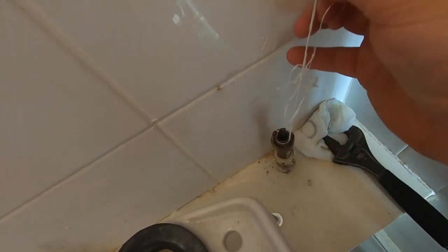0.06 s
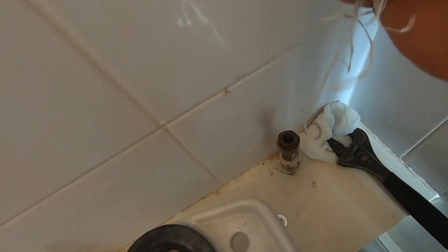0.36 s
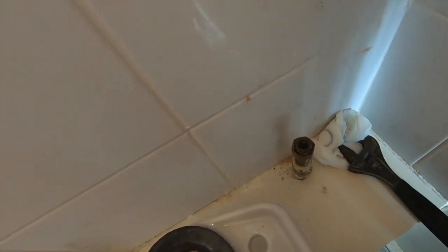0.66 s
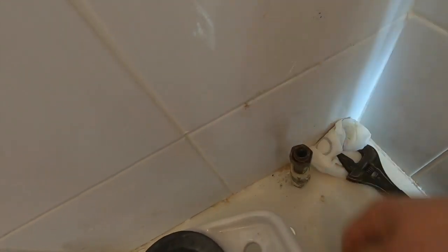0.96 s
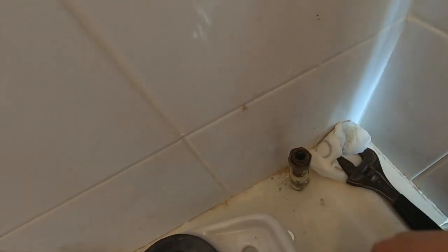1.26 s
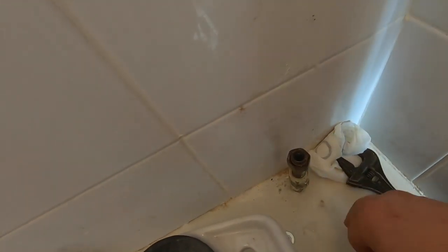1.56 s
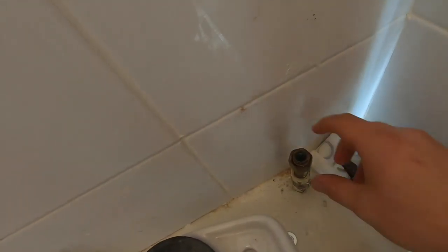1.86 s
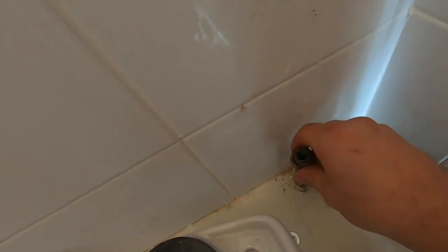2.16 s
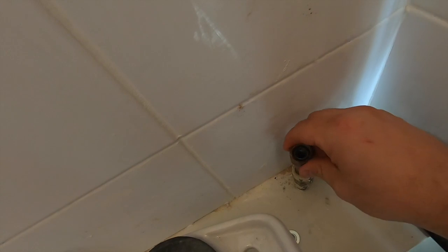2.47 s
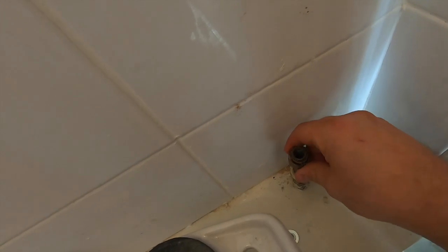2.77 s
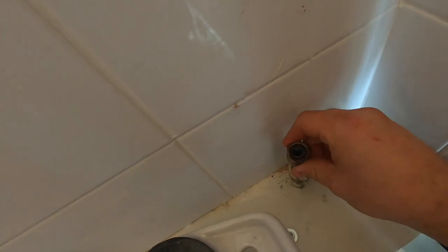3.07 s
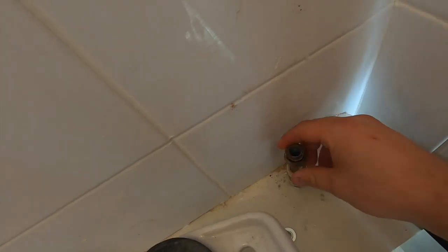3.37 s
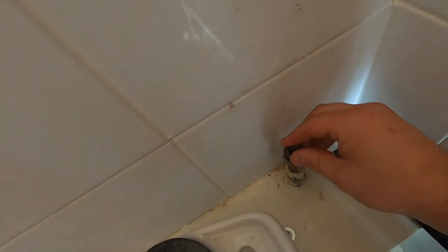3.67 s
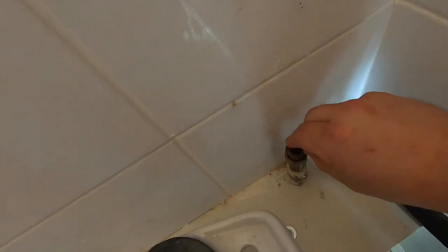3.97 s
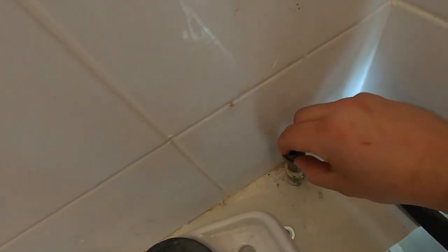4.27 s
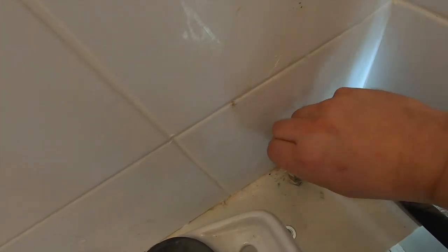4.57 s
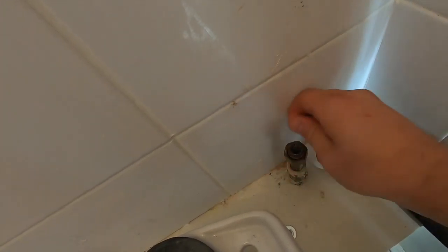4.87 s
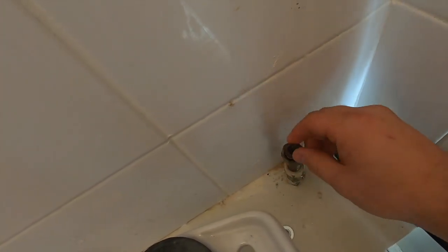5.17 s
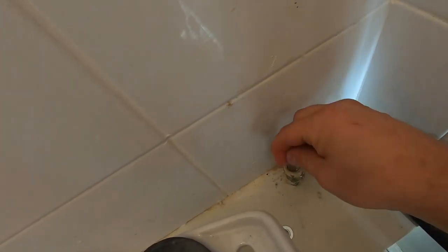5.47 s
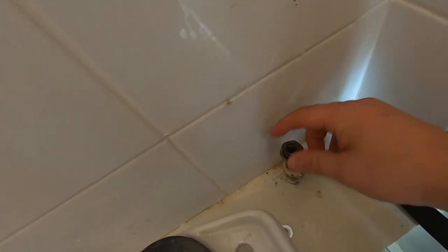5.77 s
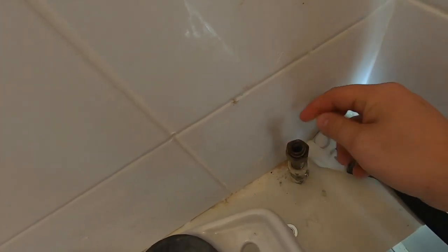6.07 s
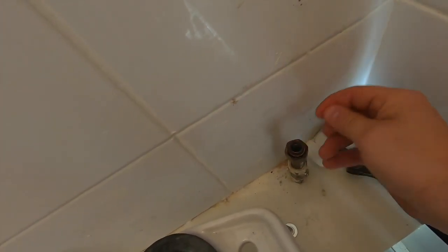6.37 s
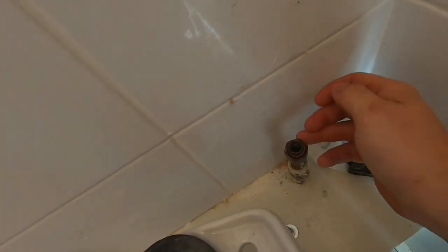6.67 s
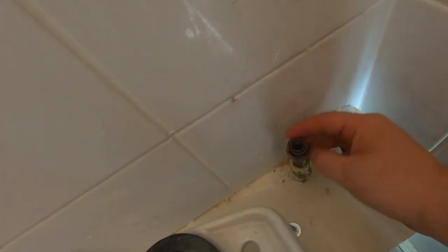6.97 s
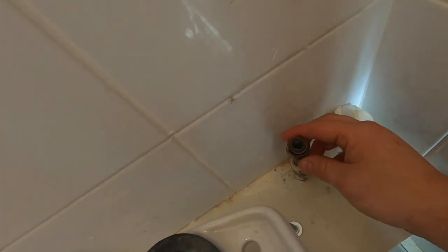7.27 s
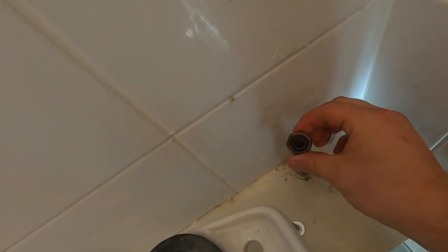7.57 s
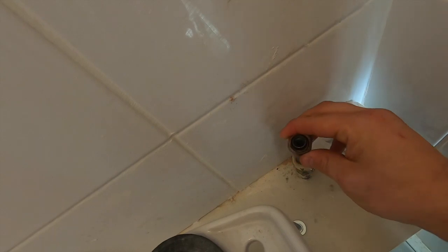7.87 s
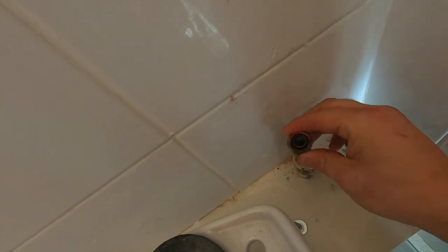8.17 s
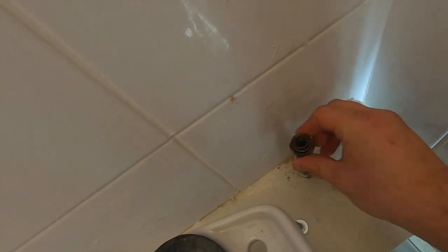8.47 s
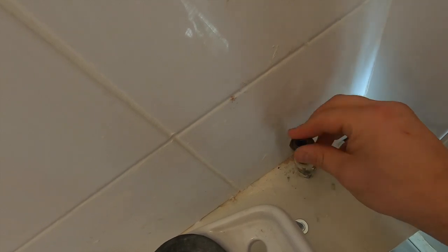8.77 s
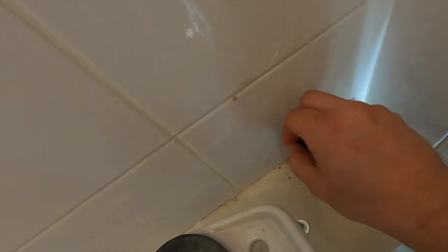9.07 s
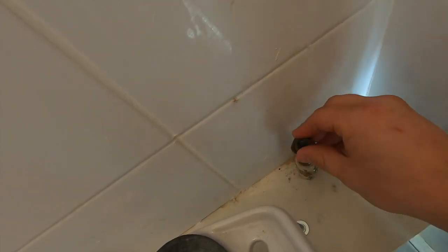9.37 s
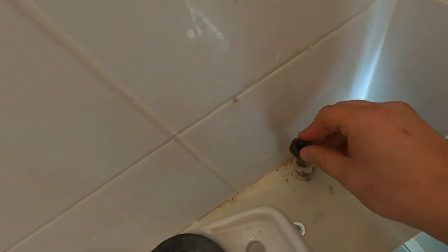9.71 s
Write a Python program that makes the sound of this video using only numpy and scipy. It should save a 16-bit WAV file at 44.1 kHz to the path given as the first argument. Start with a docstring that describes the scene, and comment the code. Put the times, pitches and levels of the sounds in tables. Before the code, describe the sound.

Soft thumps of a hand on a pipe and a faint rustle come first, close up in a small tiled bathroom. Then fingers turn a loose metal fitting on the pipe: the threads grind, catch and snap free, and the fitting knocks in uneven clusters. Each contact rings briefly with a low boom. After a quieter stretch, the last twists are loudest, with tiny squeaks and a thin metallic ring.

```python
"""Soft thumps of a hand on a pipe and a faint rustle, close up in a small tiled bathroom. Then fingers work
a loose threaded fitting onto the pipe stub: the threads grind, squeak, catch and snap free, rocking the
fitting so that it knocks in clusters. Each contact rings the metal and the tiles, with a short boom in
the bass. Skin and sealing thread hiss over still air, and the last twists seat the fitting so it sings."""
import sys
import numpy as np
from scipy import signal
from scipy.fft import rfft, irfft
from scipy.io import wavfile

SR = 44100
rng = np.random.default_rng(int(sys.argv[2]) if len(sys.argv) > 2 else 0)


def wav_out(sig):
    """Save sig, one row per channel (or a flat mono array), as 16-bit PCM at SR to the path in sys.argv[1]."""
    wavfile.write(sys.argv[1], SR, np.round(np.clip(np.atleast_2d(sig).T, -1, 1) * 32767).astype(np.int16))


N = 429534

# soft bumps of the hand on the pipe: start_s, level_db
HAND_BUMPS = [(0.0, -28), (0.073, -34.5), (0.288, -34.5), (0.324, -31), (0.399, -36.5), (2.176, -41),
              (2.39, -20), (2.985, -18), (3.642, -28.5), (4.897, -41), (5.293, -40), (5.93, -27.5),
              (6.304, -32.5), (6.687, -34.5), (6.76, -21.5), (7.095, -32.5), (7.234, -41), (7.416, -26),
              (7.539, -12.5), (7.559, -10), (7.656, -14), (7.945, -21), (8.522, -14), (8.579, -18),
              (9.46, -35), (9.626, -40.5)]
# sealing thread and skin sliding: start_s, length_s, level_db, centre_hz
SKIN_RUSTLES = [(0.0, 0.091, -72, 4370), (0.269, 0.22, -68.5, 7150), (0.283, .17, -67, 2150),
                (0.927, 0.03, -61, 3300), (1.013, 0.062, -65, 3940), (1.089, 0.01, -56, 7750),
                (1.627, 0.042, -68, 5170), (1.769, 0.029, -67.5, 6300), (1.821, 0.18, -72.5, 3400),
                (3.854, 0.025, -67.5, 2530), (4.931, 0.1, -62.5, 6050), (6.354, 0.053, -67.5, 7000),
                (6.456, 0.53, -68.5, 2510), (9.372, 0.0066, -67.5, 5120)]
# single knocks of the fitting: start_s, level_db, hardness_db_per_octave
FITTING_KNOCKS = [(1.06, -64, 4), (2.242, -46.5, -1.5), (2.605, -31.5, -1.5), (2.635, -18.5, 0),
                  (2.901, -40, -2.5), (3.131, -35, -2), (3.167, -39, -2.5), (3.583, -28.5, 0),
                  (4.316, -32.5, 0), (4.459, -33.5, -2), (4.529, -54.5, 5), (4.641, -48.5, -1.7),
                  (4.689, -45.5, -2.9), (4.866, -45.5, -1.5), (5.343, -50.5, -3), (5.476, -46.5, -0.8),
                  (5.508, -43, -3.2), (5.977, -22, 0.3), (6.294, -47.5, -5.5), (6.392, -41.5, -2.5),
                  (6.744, -23, 4.5), (6.812, -26, 0.6), (7.452, -18, -1), (7.491, -25, 5),
                  (7.609, -30.5, -0.5), (7.926, -27, -1.5), (8.055, -36, -3.5), (8.092, -22, 0.36),
                  (8.41, -22, -0.7), (8.573, -14, 1.03), (8.831, -28, 2.5), (9.068, -34.5, 3.5),
                  (9.272, -50.5, -0.6), (9.403, -51, -2)]
# smooth twists and rubs: start_s, end_s, level_db
SMOOTH_TWISTS = [(2.241, 2.3, -48), (2.494, 2.596, -35.5), (3.182, 3.226, -49), (4.062, 4.139, -44),
                 (4.693, 4.752, -52.5), (4.892, 4.999, -46.5), (5.376, 5.445, -51.5), (5.558, 5.668, -53),
                 (5.925, 5.963, -44.5), (6.345, 6.448, -48), (6.472, 6.719, -58), (7.436, 7.518, -23.5),
                 (7.598, 7.724, -29.5), (7.824, 7.897, -34), (7.892, 7.972, -28.5), (8.056, 8.119, -26.5),
                 (8.149, 8.208, -37.5), (8.206, 8.296, -27), (8.385, 8.47, -24), (8.485, 8.568, -41),
                 (9.172, 9.263, -51.5)]
# turns that catch and snap free: catch_s, snap_s, level_db, run_up_s, run_up_db, blow_count
HARD_TURNS = [(2.32, 2.33, -16, .03, -27.5, 4), (2.666, 2.678, -19.5, 0.06, -28.5, 2),
              (2.92, 2.946, -16.5, .017, -35, 4), (3.262, 3.282, -18, 0.043, -35, 3),
              (8.542, 8.545, -17, 0.062, -29, 2)]
# squeaks and groans of binding threads: middle_s, length_s, pitch_hz, level_db
THREAD_SQUEAKS = [(2.969, 0.0081, 368, -8.5), (7.449, 0.03, 791, -13), (7.928, 0.018, 1180, -30.5),
                  (8.088, 0.0136, 600, -17.5), (8.542, .003, 6550, -11), (8.57, .014, 289.3, -13)]
# the hand closes round the fitting: start_s, end_s
GRIP_SPANS = [(2.2, 3.4), (7.3, 8.7)]

# force spectra of a fleshy bump, a metal knock and one slip of the threads: frequency_hz, level_db
FLESH_TONE = [(140, -3), (400, -23.5), (1300, -36.5), (3700, -70)]
KNOCK_TONE = [(140, -0.5), (400, -7), (1300, -5), (3300, -15), (4800, -17.5), (8000, -23.5)]
GRIND_TONE = [(70, -6.5), (140, 0), (400, -5), (1300, -7.5), (3700, -20), (7000, -22)]
# hollow colour of the closed hand, which damps the clack: frequency_hz, gain_db
CUPPED_EQ = [(120, -1), (210, 2.5), (400, 3.5), (700, 1.5), (1300, -2), (3700, -1), (7000, 4)]

# booming modes of the room and the pipe's mount: pitch_hz, level_db, t60_s
BOOM_MODES = [(81, -12, 0.34), (110.9, -1, 0.33), (128.2, -6, .32), (141.9, -6.5, 0.36), (181, -2, 0.38),
              (186.9, -10.5, .62), (231.4, -10, 0.34), (245.7, -11.5, 0.31), (291.9, -2, 0.17),
              (365.8, -2.5, 0.16), (511.7, -4.5, 0.27)]
# modes of the fitting and its pipe: pitch_hz, level_db, t60_s
METAL_MODES = [(640, -12.5, 0.14), (866, -11.5, .2), (990, -12, .18), (1120, -13, 0.26), (1165, -11, .2),
               (1305, -13, 0.12), (1505, -11.5, 0.2), (2480, -13.5, 0.14), (3400, -16, .14),
               (3970, -17, .12)]
# partials that sing once the fitting sits tight: pitch_hz, level_db, t60_s
SEATED_MODES = [(2662, -12.5, 0.28), (2590, -11.5, .35), (2557, -15, .3), (7150, -21, .22)]
# dense ring of the tiled room: frequency_hz, density_db, t60_s
TILE_REVERB = [(144, -36, 0.61), (320, -30.5, 0.35), (620, -28.5, 0.21), (1090, -29.5, .28),
               (2000, -34.5, 0.28), (2940, -31.5, 0.29), (3772, -31, 0.27), (5730, -45, 0.26),
               (7300, -42.5, 0.16), (9020, -56, 0.35), (9670, -39, .22), (10390, -48.5, 0.089),
               (10600, -73, 0.13), (14300, -63, 0.11)]
# stereo width of that ring: frequency_hz, side_gain_db
REVERB_WIDTH = [(120, -20), (280, -21), (550, -4), (1100, -1), (2500, -6), (5000, -3.5), (8000, 1.5)]
# room tone of still air: frequency_hz, density_db
AIR_TONE = [(15, -30.5), (25, 3), (54, 4), (98, -13.5), (181, 3.5), (558, -14.5), (769, -4.5),
            (1150, -19.5), (1280, -15.5), (1720, -18.5), (3260, -23), (7680, -26.5), (9770, -31.5),
            (15000, -54.5)]

RING_SAMPLES, PULSE_SAMPLES = int(.8 * SR), 2048


def undb(db):
    """Decibels to gain."""
    return 10 ** (np.asarray(db) / 20)


def pan(left_minus_right_db):
    """Gains for the left and right channels."""
    return undb(left_minus_right_db * np.array([[.5], [-.5]]))


def gains(hz, db, size):
    """EQ curve: gain at each frequency bin, along straight lines on a log axis."""
    return undb(np.interp(np.log(np.arange(size // 2 + 1) * SR / size + 1), np.log(hz), db))


def colour(x, hz, db):
    """Shape a signal with an EQ curve."""
    return irfft(rfft(x) * gains(hz, db, x.shape[-1]), x.shape[-1])


def add(track, start_s, x):
    """Mix x into the track from start_s on."""
    i = int(np.clip(start_s * SR, 0, N - 1))
    track[i:i + len(x)] += x[:N - i]


def decay(t60_s):
    """Envelope that falls 60 dB in t60_s."""
    return np.exp(-np.log(1000) * np.arange(RING_SAMPLES) / SR / t60_s)


def ring(modes):
    """Decaying modes; neighbours start in opposite directions."""
    t = np.arange(RING_SAMPLES) / SR
    return sum((-1) ** k * undb(db) * np.sin(2 * np.pi * hz * t) * decay(t60_s)
               for k, (hz, db, t60_s) in enumerate(modes))


def push(hz, db):
    """Minimum-phase force pulse with this spectrum: the duller the contact, the longer it pushes."""
    cepstrum = irfft(np.log(gains(hz, db, PULSE_SAMPLES)))
    cepstrum[1:PULSE_SAMPLES // 2] *= 2
    cepstrum[PULSE_SAMPLES // 2 + 1:] = 0
    return irfft(np.exp(rfft(cepstrum)))


def slips(length_s, rate_hz, scatter_db):
    """Stick and slip: tiny uneven jerks that swell and fade, with unit energy in all."""
    jerks = np.zeros(max(int(length_s * SR), 64))
    count = int(rate_hz * length_s) + 3
    place, strength, direction = rng.random((1024, 3))[:count].T
    swell = np.sin(np.pi * place) ** .59
    heights = np.sign(direction - .5) * undb(scatter_db * strength) * swell
    np.add.at(jerks, (place * len(jerks)).astype(int), heights)
    return jerks / np.sqrt(np.sum(jerks ** 2))


def contact(tone, start_s, db, hardness=0, pivot_hz=680, top_hz=2000, firm_db=-23):
    """One force pulse, tilted by hardness (dB per octave) and hollower inside the closed hand."""
    hz = np.geomspace(70, 8000, 18)

    def curve(points):
        """Level of a spectrum at each of these frequencies."""
        point_hz, point_db = np.transpose(points)
        return np.interp(np.log(hz), np.log(point_hz), point_db)

    tilt_db = hardness * np.log2(np.maximum(hz, 140) / pivot_hz)
    # soft or light contacts last longer and lose their top
    droop_db_per_octave = 1.5 * max(-hardness, 0) + .27 * np.clip(firm_db - db, 0, 11.5)
    droop_db = droop_db_per_octave * np.maximum(np.log2(hz / top_hz), 0)
    gripped = any(close_s < start_s < open_s for close_s, open_s in GRIP_SPANS)
    return push(hz, curve(tone) + db + tilt_db - droop_db + gripped * curve(CUPPED_EQ))


def bumps():
    """Flesh pushes slowly on the pipe: all body, hardly any top."""
    force = np.zeros(N)
    for start_s, db in HAND_BUMPS:
        add(force, start_s, contact(FLESH_TONE, start_s, db))
    return force


def pipe(force, level_db=-1):
    """The metal rings a little to the right; the boom fills the room more evenly."""
    modes = undb(level_db) * (ring(BOOM_MODES) * pan(-.4) + ring(METAL_MODES) * pan(-2))
    return signal.oaconvolve(force[None], modes, axes=1)[:, :N]


def tile_response(direct_db=16.5, side_db=-1.5, build_up_s=.025):
    """The direct click, a few distinct wall echoes, then a dense tail that lasts longest in the bass."""
    t = np.arange(RING_SAMPLES) / SR
    hz, db, t60_s = np.transpose(TILE_REVERB)
    density = np.minimum(.03 + (t / build_up_s) ** 2, 1)
    echoes = rng.standard_normal((2, len(t))) * (rng.random((2, len(t))) < density) / np.sqrt(density)
    spectrum, tail = rfft(echoes), 0
    log_hz = np.log(np.arange(RING_SAMPLES // 2 + 1) * SR / RING_SAMPLES + 1)
    for solo, band_t60_s in zip(np.eye(len(hz)), t60_s):
        band = irfft(spectrum * np.interp(log_hz, np.log(hz), solo), RING_SAMPLES)
        tail = tail + band * decay(band_t60_s)
    tail[0, 0] += undb(direct_db)
    tile_colour = push(hz, db) * np.sqrt(SR / 2)
    mid, side = signal.fftconvolve(tail, tile_colour[None], axes=1)[:, :RING_SAMPLES]
    side = undb(side_db) * colour(side, *np.transpose(REVERB_WIDTH))
    return np.array([mid + side, mid - side])


def room(force, pose_s=.37, poses=3):
    """The moving hand shades and reflects the sound, so the echoes crossfade from pose to pose."""
    pose = np.arange(N) / SR / pose_s
    reverb = 0
    for k in range(poses):
        distance = np.abs((pose - k + poses / 2) % poses - poses / 2)
        fade = np.cos(np.pi / 2 * np.minimum(distance, 1))
        reverb = reverb + signal.oaconvolve((force * fade)[None], tile_response(), axes=1)[:, :N]
    return reverb * pan(-2)


def fidgets(count=40, level_db=-81, spread_db=3, typical_s=.1, low_hz=2200, high_hz=8000):
    """Faint stray rustles at random moments: start_s, length_s, level_db, centre_hz."""
    when, length, level, pitch = rng.random((count, 4)).T
    db = level_db + spread_db * (2 * level - 1)
    centre_hz = low_hz * (high_hz / low_hz) ** pitch
    return list(zip(when * N / SR, typical_s * (.5 + length), db, centre_hz))


def rustles(t60_s=.25, direct_db=26):
    """Fine fibres catch and let go in a soft, grainy hiss; the tiles smear it."""
    hiss = np.zeros(N)
    for start_s, length_s, db, hz in SKIN_RUSTLES + fidgets():
        fibre = push([hz / 8, hz / 2, hz, hz * 2, hz * 4], db=[-20, -10, 0, -9, -28])
        grains = signal.fftconvolve(slips(length_s, rate_hz=1100, scatter_db=26), fibre)
        grain_rms = np.sqrt(np.sum(grains ** 2) / ((length_s + .016) * SR))
        add(hiss, start_s, undb(db) * grains / grain_rms)
    walls = rng.standard_normal((2, RING_SAMPLES)) * decay(t60_s)
    walls[:, 0] = undb(direct_db)
    walls /= np.sqrt(np.sum(walls ** 2) / 2)
    walls = signal.sosfilt(signal.butter(2, 9500, fs=SR, output="sos"), walls)
    return signal.fftconvolve(hiss[None], walls, axes=1)[:, :N]


def air(mid_db=-70, side_db=-5):
    """A faint, steady bed of room tone."""
    mid, side = colour(rng.standard_normal((2, N)), *np.transpose(AIR_TONE))
    side = undb(side_db) * side
    return undb(mid_db) / np.std(mid) * np.array([mid + side, mid - side])


def knock(start_s, db, hardness, chatter_s=.0045, chatter_share=.53):
    """The fitting strikes the pipe and chatters for an instant, never twice alike."""
    pulse = contact(KNOCK_TONE, start_s, db, hardness)
    # only the sharp attack breaks up into chatter
    attack = signal.sosfilt(signal.butter(1, 600, "high", fs=SR, output="sos"), pulse)
    chatter = slips(chatter_s, rate_hz=1500, scatter_db=11.5)
    force = np.sqrt(chatter_share) * signal.fftconvolve(chatter, attack)
    add(force, 0, pulse - (1 - np.sqrt(1 - chatter_share)) * attack)
    return force


def knocks():
    """The fingers nudge the loose fitting against the pipe."""
    force = np.zeros(N)
    for start_s, db, hardness in FITTING_KNOCKS:
        add(force, start_s, knock(start_s, db, hardness))
    return force


def grind(start_s, length_s, db, hardness=0, grit_per_db=.16, moderate_db=-33.5):
    """The threads scrape over each other in a quick run of slips, brighter under more pressure."""
    pulse = contact(GRIND_TONE, start_s, db, hardness + grit_per_db * (db - moderate_db))
    return signal.fftconvolve(slips(length_s, rate_hz=450, scatter_db=18), pulse)


def twists():
    """The fingers ease the fitting round without a catch."""
    force = np.zeros(N)
    for start_s, end_s, db in SMOOTH_TWISTS:
        add(force, start_s, grind(start_s, end_s - start_s, db))
    return force


def hard_turns(rock_s=.012, unevenness=.35, judder_s=.06):
    """The thread grinds, catches, rocks the fitting and snaps free, while the straining hand judders."""
    force = np.zeros(N)
    for catch_s, snap_s, db, run_up_s, run_up_db, blows in HARD_TURNS:
        add(force, catch_s - run_up_s, grind(catch_s, run_up_s, run_up_db, hardness=-2))
        add(force, catch_s, knock(catch_s, db, hardness=-1.2))
        # weaker but harder rebounds, with the thread grinding on underneath
        for k in range(1, blows):
            delay_s = rock_s * (k + unevenness * rng.uniform(-1, 1))
            add(force, catch_s + delay_s, knock(catch_s, db - 6, hardness=1))
        add(force, catch_s, grind(catch_s, blows * rock_s, db - 5))
        add(force, snap_s, knock(catch_s, db - 3.5, hardness=3.83))
        judder = slips(judder_s, rate_hz=400, scatter_db=8.5)
        add(force, catch_s, signal.fftconvolve(judder, contact(FLESH_TONE, catch_s, db + 1.5)))
    return force


def squeaks():
    """The threads bind, and for a moment their slips lock onto one pitch."""
    force = np.zeros(N)
    for middle_s, length_s, hz, db in THREAD_SQUEAKS:
        swell = np.hanning(int(length_s * SR))
        tone = np.sin(2 * np.pi * hz * np.arange(len(swell)) / SR)
        add(force, middle_s - length_s / 2, undb(db) * tone * swell / (swell.sum() / 2))
    return force


def seated_ring(force, loose_db=-19, seating_s=(7.7, 8.54)):
    """The fitting's high partials sing out as the last twists seat it."""
    drive = undb(np.interp(np.arange(N) / SR, seating_s, [loose_db, 0]))
    return signal.oaconvolve(force * drive, ring(SEATED_MODES))[:N]


def scene():
    """All contacts drive the same pipe and room; rustles and air are layered on top."""
    force = knocks() + bumps() + twists() + squeaks() + hard_turns()
    # the pipe gives way to a slow push without radiating it
    force = signal.sosfilt(signal.butter(4, 68, "high", fs=SR, output="sos"), force)
    return pipe(force) + seated_ring(force) + room(force) + rustles() + air()


def record(dry):
    """A steep high cut at 14.8 kHz takes off the very top."""
    return signal.sosfilt(signal.ellip(8, .2, 70, 14800, fs=SR, output="sos"), dry)


dry = scene()
out = record(dry)
wav_out(out)
```